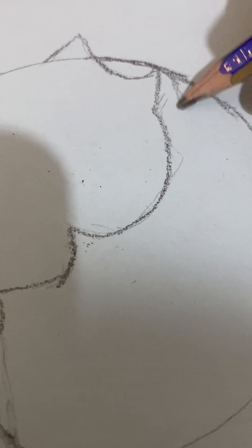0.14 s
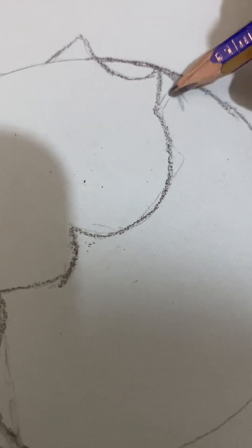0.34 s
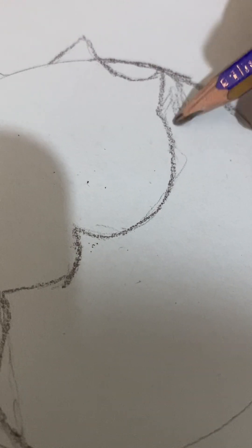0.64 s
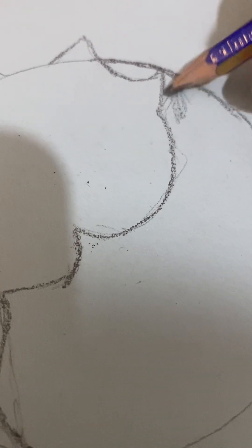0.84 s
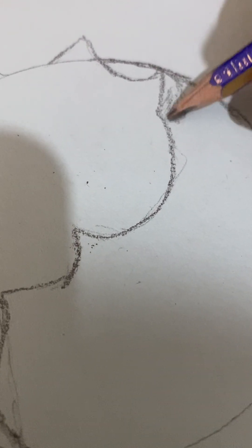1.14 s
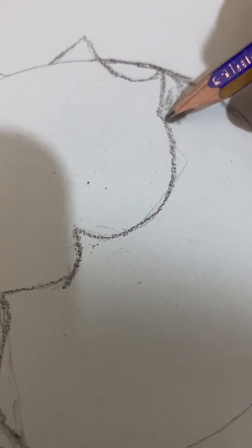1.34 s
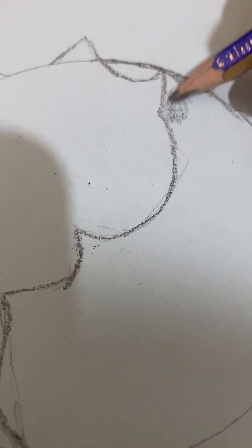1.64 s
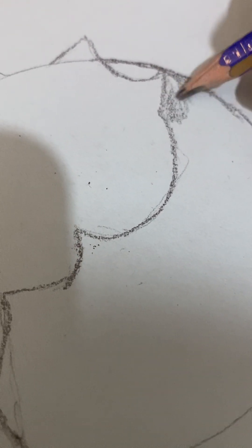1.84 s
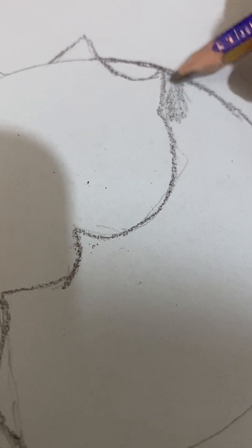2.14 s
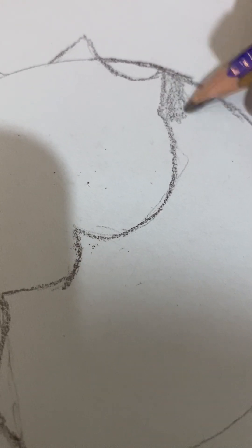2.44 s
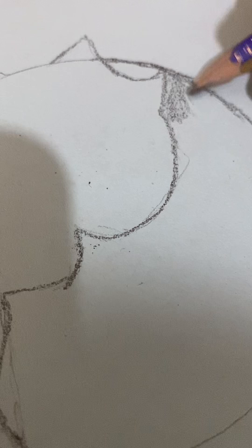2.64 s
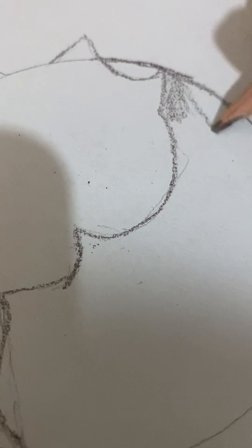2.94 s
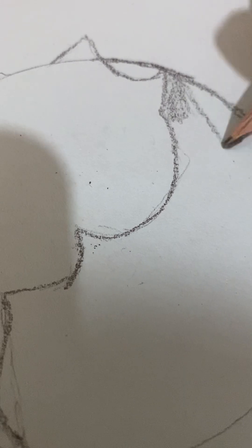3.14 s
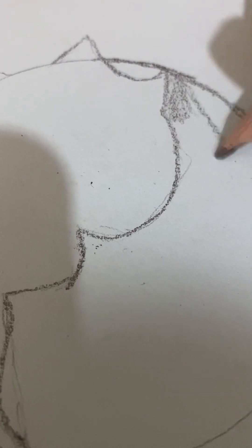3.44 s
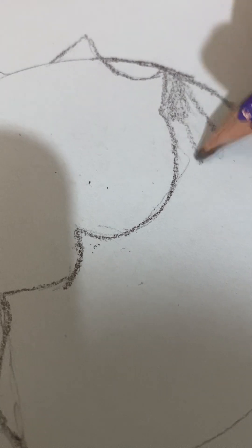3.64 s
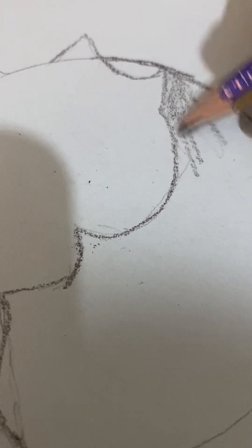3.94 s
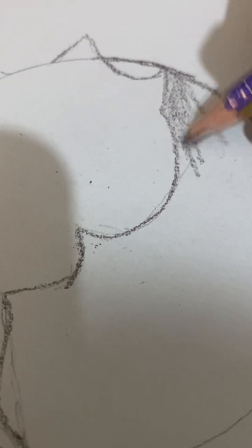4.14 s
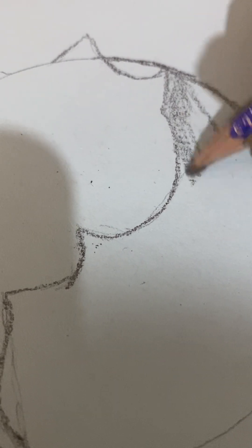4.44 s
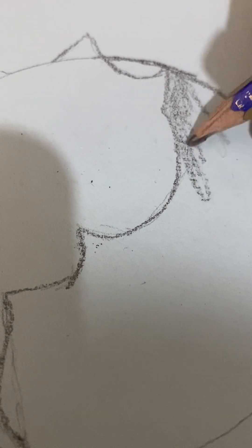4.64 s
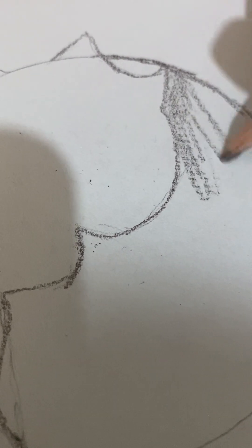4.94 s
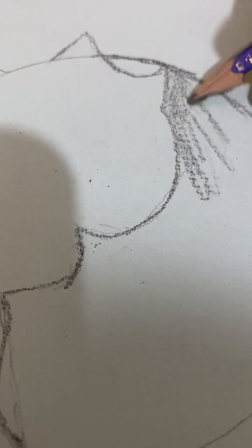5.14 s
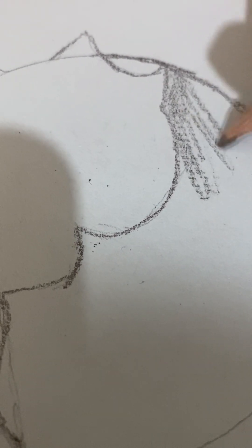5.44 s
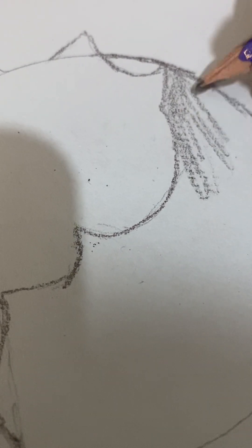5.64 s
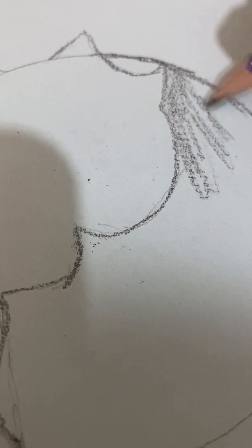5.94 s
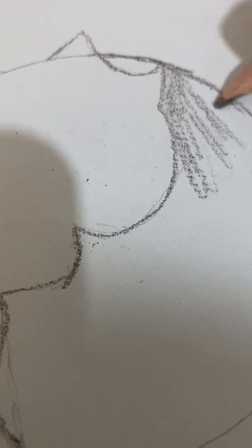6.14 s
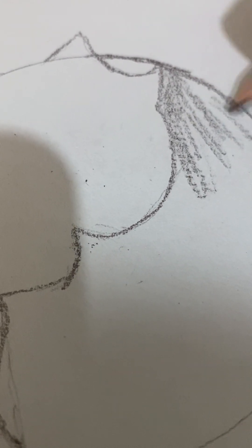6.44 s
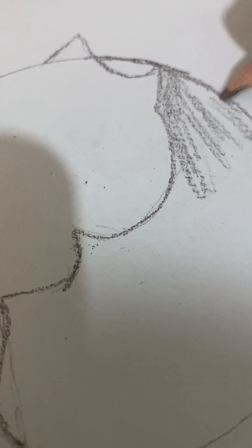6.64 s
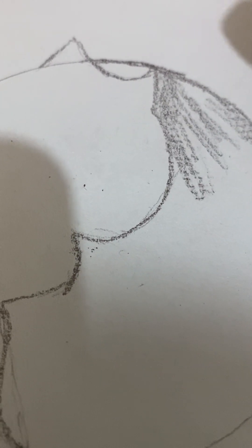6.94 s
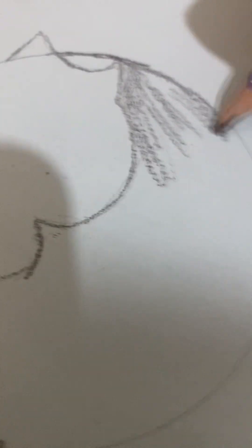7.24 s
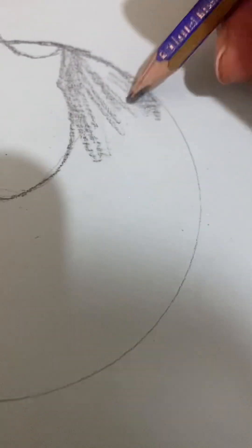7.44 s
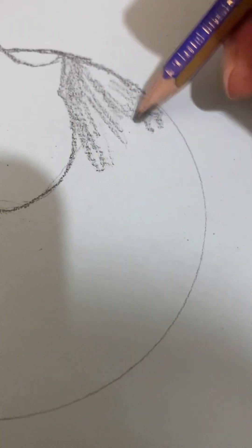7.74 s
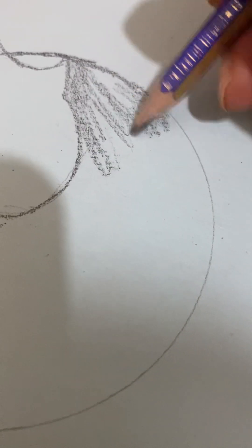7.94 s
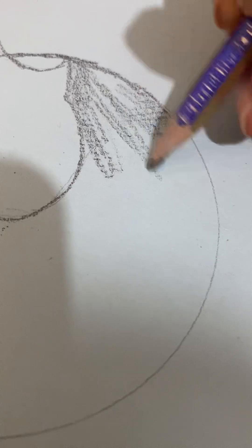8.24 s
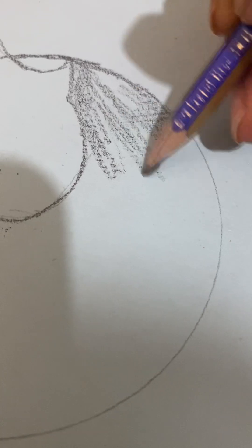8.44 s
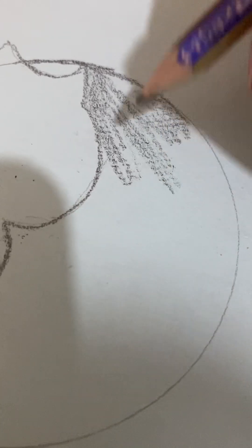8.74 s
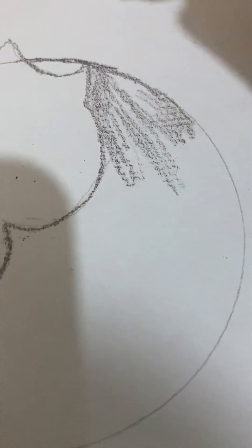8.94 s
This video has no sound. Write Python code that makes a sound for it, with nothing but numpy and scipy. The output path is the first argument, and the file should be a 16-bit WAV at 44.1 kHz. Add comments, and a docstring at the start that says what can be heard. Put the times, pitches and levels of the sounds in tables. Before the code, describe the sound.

A pencil shades on paper in quick back-and-forth strokes, the lead hissing and rasping over a hollow board. Now and then the tip ticks or knocks lightly. Near the end comes one soft low thump, the last strokes grow louder, and a hand brushes the sheet among a few final ticks. The microphone is close, in a quiet room with a low hum.

```python
"""A quiet room, a phone close above a pencil and paper on a hollow board; a low room resonance hums.
From the start the pencil shades in quick back-and-forth strokes: the lead hisses over the paper's
tooth and shakes the board. Now and then the tip ticks as it lands or lifts, knocking hardest at 5.7 s.
Just after 8 s the room booms once under a soft thump and the last strokes grow louder.
Around 9 s the hand brushes the sheet as it leaves, among a few last ticks."""
import sys
import numpy as np
from scipy import signal
from scipy.fft import rfft, irfft, next_fast_len
from scipy.io import wavfile
from scipy.ndimage import uniform_filter1d

SR = 44100
rng = np.random.default_rng(int(sys.argv[2]) if len(sys.argv) > 2 else 0)


def log_audio(samples):
    """Write samples as a 16-bit WAV file to the path given in sys.argv[1]."""
    # one column per channel
    frames = np.atleast_2d(samples).T
    # limit to full scale, then quantise
    limited = np.clip(frames, -1, 1)
    pcm = np.round(limited * 32767).astype(np.int16)
    wavfile.write(sys.argv[1], SR, pcm)


N = 400428
FFT_SIZE = next_fast_len(N)
BIN_HZ = np.arange(FFT_SIZE // 2 + 1) * SR / FFT_SIZE
DOWN, UP = "down", "up"


def strokes(release_ms=5.6, hiss_arch_db=2.5, board_arch_db=6):
    """Hiss gain, board gain, brightness in dB: the tip bites, runs fastest mid-stroke, stops to turn."""
    # the shading: (start [s], length [s], hiss level [dB], direction)
    shading = [(0.08, 0.099, -52, DOWN), (0.214, 0.073, -54, UP), (0.328, 0.079, -52, DOWN),
               (0.436, 0.051, -55, UP), (0.494, 0.041, -57.5, UP), (0.57, 0.099, -53, DOWN),
               (0.688, 0.091, -53.5, UP), (0.818, 0.087, -52, DOWN), (0.926, 0.085, -54.5, UP),
               (1.041, 0.076, -51.5, DOWN), (1.15, 0.084, -56, UP), (1.262, 0.085, -53.5, DOWN),
               (1.376, 0.086, -54, UP), (1.493, 0.075, -55, DOWN), (1.581, 0.063, -58.5, UP),
               (1.715, 0.088, -54.5, DOWN), (1.847, 0.068, -56.5, UP), (1.958, 0.067, -54.5, DOWN),
               (2.051, 0.1, -57, UP), (2.183, 0.074, -54.5, DOWN), (2.274, 0.099, -58.5, UP),
               (2.392, 0.11, -54.5, DOWN), (2.53, 0.069, -59, UP), (2.618, 0.1, -50, DOWN),
               (2.728, 0.033, -62.5, UP), (2.833, 0.082, -53, DOWN), (3.005, 0.018, -51.5, UP),
               (3.054, 0.086, -51.5, DOWN), (3.166, 0.11, -57, UP), (3.295, 0.11, -53, DOWN),
               (3.418, 0.087, -55.5, UP), (3.533, 0.092, -51.5, DOWN), (3.648, 0.092, -53.5, UP),
               (3.754, 0.098, -51, DOWN), (3.873, 0.084, -51.5, UP), (3.975, 0.091, -52.5, DOWN),
               (4.097, 0.077, -53, UP), (4.195, 0.1, -52, DOWN), (4.325, 0.069, -51.5, UP),
               (4.421, 0.11, -50.5, DOWN), (4.541, 0.059, -52, UP), (4.646, 0.1, -53, DOWN),
               (4.764, 0.064, -52.5, UP), (4.891, 0.1, -52, DOWN), (5.008, 0.049, -58, UP),
               (5.132, 0.082, -50, DOWN), (5.219, 0.057, -62.5, UP), (5.379, 0.078, -50.5, DOWN),
               (5.47, 0.053, -63.5, UP), (5.698, 0.07, -52.5, DOWN), (5.801, 0.088, -55.6, UP),
               (5.915, 0.098, -49.5, DOWN), (6.156, 0.093, -49, DOWN), (6.273, 0.047, -53, UP),
               (6.333, 0.038, -54, UP), (6.403, 0.11, -50.5, DOWN), (6.518, 0.023, -54.5, UP),
               (6.633, 0.11, -52.5, DOWN), (6.758, 0.072, -56, UP), (6.86, 0.11, -52, DOWN),
               (6.98, 0.077, -56, UP), (7.086, 0.084, -53, DOWN), (7.197, 0.054, -61, UP),
               (7.275, 0.06, -63.5, DOWN), (7.37, 0.072, -59, UP), (7.468, 0.077, -52.5, DOWN),
               (7.582, 0.079, -54, UP), (7.694, 0.088, -51, DOWN), (7.815, 0.066, -53.5, UP),
               (7.904, 0.1, -49.5, DOWN), (8.037, 0.07, -52, UP), (8.127, 0.093, -49, DOWN),
               (8.241, 0.083, -53.7, UP), (8.348, 0.1, -46, DOWN), (8.475, 0.067, -48, UP),
               (8.564, 0.083, -45.5, DOWN)]
    # downstrokes bite and fade, upstrokes are duller and swell:
    # (brightness [dB], swell from middle to end [dB], attack [ms], board level [dB])
    directions = {DOWN: (1, -2.5, 5.5, 0.5), UP: (-3.5, 2, 5.5, -0.5)}
    # the hand's travel over the sheet: (time [s], board over hiss [dB], brightness [dB])
    travel = [(0.1, -1.5, -4.5), (1.5, -1.5, -2), (1.75, -12, -1.5), (2.1, -4, -0.5), (2.3, 0.5, -1),
              (2.7, 4, -6), (3.2, 6.5, -7), (4.1, 9.5, -3.5), (4.4, 3, -1), (4.8, 9, -1.5), (5.4, 3.5, -5),
              (5.7, 6, -4.5), (6.3, 4, 0), (6.65, 7, 1.5), (7.1, 2, 5), (7.4, 0, -7.5), (7.8, -1.5, -2.5),
              (8.2, 3, -3.5), (8.6, 2, -1.5)]
    times, board_curve, bright_curve = np.transpose(travel)
    hiss, shake, brightness = np.zeros((3, N))
    for start, length, hiss_db, way in shading:
        bright_db, swell_db, attack_ms, board_db = directions[way]
        board_db = board_db + hiss_db + np.interp(start, times, board_curve)
        bright_db = bright_db + np.interp(start, times, bright_curve)
        at = np.arange(int((start - .07) * SR), int((start + length + .07) * SR))
        ms = 1000 * (at / SR - start)
        along = np.clip(ms / (500 * length) - 1, -1, 1)  # -1 at the start, 1 at the end
        attack = 1 / (1 + 4 ** (-ms / attack_ms))
        edges = attack / (1 + 4 ** ((ms - 1000 * length) / release_ms))
        gain = edges * undb(hiss_db + swell_db * along - hiss_arch_db * along ** 2)
        brightness[at] = np.where(gain > hiss[at], bright_db, brightness[at])  # the louder stroke wins
        hiss[at] += gain
        shake[at] += edges * undb(board_db + swell_db * along - board_arch_db * (along - .25) ** 2)
    return hiss, shake, uniform_filter1d(brightness, SR // 200)


def scratch(gain, bright_db, catch_db=2.2):
    """The lead hisses and catches on the paper; each band wavers a little as the tip turns."""
    # grip and worn tip colour the hiss: (time [s], rasp near 5 kHz [dB], sheen near 10 kHz [dB])
    grip = [(0, 0, -1), (2.4, -1.5, -1), (3.5, 0.5, 0.5), (5, 1, -0.5), (6, 2, -1.5), (7.1, 4.5, -4),
            (7.4, 5.5, 0), (8.6, 3.5, 1)]
    times, *columns = np.transpose(grip)
    rasp_db, sheen_db = (np.interp(np.arange(N) / SR, times, column) for column in columns)
    grit = level(shaft(tooth()), 0)
    bands = split(grit, edges_hz=(4680, 6040, 7860, 11250), soft_hz=320)
    gains_db = (-.2 * bright_db, rasp_db - .5 * bright_db, -.4 * bright_db,
                sheen_db + .16 * bright_db, .71 * bright_db)
    hiss = sum(part * undb(db + 1.2 * walk(12)) for part, db in zip(bands, gains_db))
    return hiss * gain * undb(catch_db * walk(70))


def tooth(grain_db=1.97):
    """The paper's tooth: grains of uneven size, like fibres snapping under the lead."""
    # spectrum of lead on paper: (frequency [Hz], level [dB])
    spectrum = [(450, -1), (1200, -3), (2000, -7), (2900, -3), (3900, -5), (4800, -1), (7200, -9),
                (8600, -4), (10300, 0), (11300, -1.5), (12500, 1.5), (15800, -2)]
    grains = noise() * undb(grain_db * rng.exponential(1, N))
    return colour(level(grains, 0), spectrum)


def shaft(grit):
    """The pencil's own resonances, each waxing and waning as it turns in the fingers."""
    # ring of lead and wood: (frequency [Hz], width [Hz], gain [dB])
    rings = [(4900, 190, -8.5), (5746, 500, 0.5), (6660, 170, 2.5)]
    return grit + sum(band(grit, hz, width) * undb(db + 3.5 * walk(7)) for hz, width, db in rings)


def board(push):
    """The hollow board rung by a force; neighbouring modes swing in opposite senses at the microphone."""
    # board modes: (frequency [Hz], gain [dB], time to fall 60 dB [s])
    modes = [(186, -24, .08), (305.6, 3.5, 0.074), (446, -1, 0.02), (605, -1, 0.014), (1175, -8.5, 0.0046)]
    ring = 0
    for order, (hz, db, t60) in enumerate(modes):
        pole = np.exp(2j * np.pi * hz / SR - np.log(1000) / (t60 * SR))
        ring = ring + (-1) ** order * undb(db) * signal.lfilter([1], [1, -pole], push).imag
    # the small board sends out no deep bass
    return signal.sosfilt(signal.butter(2, 170, "high", fs=SR, output="sos"), ring)


def ticks(crack_s=0.0011, tail_s=0.0072, tail_db=-22, push_s=0.00027, late_s=0.0019):
    """The tip lands or lifts: a sharp crack with a papery tail, then a push that knocks the board."""
    # touches of the tip: (time [s], crack level [dB], push on the board [dB])
    touches = [(1.679, -57, -44.5), (3.0093, -48.5, -57), (4.8645, -64, -39), (5.694, -47, -28),
               (6.038, -59, -62), (6.1284, -74, -41.5), (6.4358, -47, -34), (6.6087, -73, -43.5),
               (8.6885, -44, -45), (8.732, -52, -58), (8.7981, -50, -55), (8.9846, -34, -73),
               (9.0257, -47, -51)]
    t = np.arange(SR // 20) / SR
    crack, push = np.zeros((2, N + len(t)))
    spike = (t / crack_s * np.exp(1 - t / crack_s)) ** 2
    tail = undb(tail_db) * np.exp(-t / tail_s) * (t > crack_s)
    blow = np.hanning(int(push_s * SR))
    for start, crack_db, push_db in touches:
        at, late = int(start * SR), int((start + late_s) * SR)
        crack[at:at + len(t)] += undb(crack_db) * (spike + tail)
        push[late:late + len(blow)] += undb(push_db) * blow / blow.sum()
    snap = level(colour(noise(), [(1000, -8.0), (4000, -1.5), (8000, -2.5)]), 1.4)
    return crack[:N] * snap + board(push[:N])


def brushes():
    """Gain of the light rustle as the hand leaves the sheet: each brush swells and dies away."""
    # sweeps of the hand: (peak time [s], level [dB], rise [s], fall [s])
    sweeps = [(8.70, -55.5, .012, 0.037), (8.93, -63, 0.041, 0.079), (9.025, -65.5, 0.029, 0.0049)]
    t = np.arange(N) / SR
    return sum(undb(db) * np.exp(-np.abs(t - peak) / np.where(t < peak, rise, fall))
               for peak, db, rise, fall in sweeps)


def phone_echo(x, bright_db, lag_s=0.000833, sway=0.078, lean_per_db=.015, gain=0.15):
    """A reflection off the phone just above; its path drifts with the hand and shifts with each stroke."""
    lag = (lag_s * SR * (1 + sway * walk(2) + lean_per_db * bright_db)).astype(int)
    reflected = x[:, np.maximum(np.arange(N) - lag, 0)]
    return (x + gain * reflected) / np.sqrt(1 + gain ** 2)


def thump():
    """A soft weight lands: the room's low resonance swells and dies within a few cycles."""
    # the boom: (start [s], peak level [dB], frequency [Hz], time to peak [s], abruptness [exponent])
    boom = (8.142, -25.8, 58.3, .075, 2.2)
    start, peak_db, hz, rise_s, abruptness = boom
    t = np.maximum(np.arange(N) / SR - start, 0)
    swell = (t / rise_s * np.exp(1 - t / rise_s)) ** abruptness
    return undb(peak_db) * swell * np.sin(2 * np.pi * hz * t)


def walls(x, t60_s=0.33, tail_db=-16):
    """The walls return a decaying tail, faint this close to the pencil."""
    t = np.arange(int(.6 * SR)) / SR
    tail = rng.standard_normal(len(t)) * undb(-60 * t / t60_s) * (t > .004)
    tail *= undb(tail_db) / np.sqrt(np.sum(tail ** 2))
    return signal.fftconvolve(x, tail[None], axes=1)[:, :N]


def room_tone(air_db=-52):
    """Dull room noise with a few wavering low resonances."""
    # spectrum of the room's air: (frequency [Hz], level [dB])
    spectrum = [(25, -33), (42, -5), (70, 0.5), (100, -2.5), (146, -10.5), (195, -5.5), (300, -10),
                (470, -14.5), (920, -24), (2000, -34.5), (4000, -39), (8000, -54.5), (16000, -55)]
    # room resonances: (frequency [Hz], filter width [Hz], level [dB])
    resonances = [(55.74, 9.3, -54), (118.6, 2.2, -72), (198.6, 11.6, -64)]
    hum = sum(level(band(band(noise(), hz, width), hz, width), db) for hz, width, db in resonances)
    return level(colour(noise(), spectrum), air_db) + hum


def undb(db):
    """Gain of a level in dB."""
    return 10 ** (np.asarray(db) / 20)


def level(x, db):
    """Scale to an rms level."""
    return x * undb(db) / np.sqrt(np.mean(x ** 2))


def noise():
    """Two unrelated noises: the direct wave and what is scattered round the phone."""
    return rng.standard_normal((2, N))


def walk(rate_hz):
    """Glide between random values, rate_hz of them a second; spread near 1."""
    hold = int(SR / rate_hz)
    steps = np.repeat(rng.standard_normal(N // hold + 1), hold)
    return uniform_filter1d(steps, hold)[:N]


def colour(x, points):
    """Filter by (frequency [Hz], gain [dB]) points."""
    hz, db = np.transpose(points)
    gain = undb(np.interp(np.log(np.maximum(BIN_HZ, 1)), np.log(hz), db))
    return irfft(rfft(x, FFT_SIZE) * gain, FFT_SIZE)[..., :N]


def band(x, hz, width_hz):
    """Two-pole resonance, gain 1 at the centre."""
    return signal.lfilter(*signal.iirpeak(hz, hz / width_hz, fs=SR), x)


def split(x, edges_hz, soft_hz):
    """Neighbouring bands that add up to the whole."""
    whole = rfft(x, FFT_SIZE)
    above = [1] + [.5 + .5 * np.tanh((BIN_HZ - edge) / soft_hz) for edge in edges_hz] + [0]
    return [irfft(whole * (a - b), FFT_SIZE)[..., :N] for a, b in zip(above, above[1:])]


def scene():
    """Pencil up close, room behind it; row 0 is the direct wave, row 1 its scattered twin."""
    hiss_gain, board_gain, bright_db = strokes()
    friction = noise() * undb(2.96 * walk(45))
    shaken = level(board(friction), 2.02) * board_gain
    hiss = scratch(hiss_gain + brushes(), bright_db)
    pencil = phone_echo(hiss, bright_db) + shaken + ticks()
    return pencil + walls(pencil) + room_tone() + thump()


def record(dry, dwell=0.23, top_hz=15720):
    """The phone's two spaced microphones: lag turns the treble between mid and side; scatter widens it."""
    # the pair: (frequency [Hz], left phase lead [rad], left minus right [dB], likeness [0-1])
    ports = [(60, 0, 0, .9995), (300, 0, -2.6, .99), (800, -.1, -1.5, .87), (1500, -.3, 2, .85),
             (2000, -.3, -2, .6), (2500, -2.0, 0, .3), (3600, -1.6, -2.5, .3), (4900, 0, 0, .7),
             (7450, 3.14, 0, .7), (10400, 6.28, 0, .7), (13350, 9.42, 0, .7), (15900, 12.4, 0, .7)]
    hz, *columns = np.transpose(ports)
    phase, pan_db, alike = (np.interp(BIN_HZ, hz, column) for column in columns)
    phase = phase - dwell * np.sin(2 * phase) / 2  # lingers near whole and half turns
    direct, scattered = rfft(dry, FFT_SIZE)
    diffuse = np.sqrt(1 - alike ** 2) * scattered
    below_treble = np.exp(-(BIN_HZ / 3500) ** 4)
    mid = np.cos(phase / 2) * direct
    side = 1j * np.sin(phase / 2) * (alike * direct + diffuse) + .72 * below_treble * diffuse
    left, right = (mid + side) * undb(pan_db / 2), (mid - side) * undb(-pan_db / 2)
    pair = irfft(np.array([left, right]), FFT_SIZE)[:, :N]
    return signal.sosfilt(signal.ellip(10, .2, 70, top_hz, fs=SR, output="sos"), pair)


dry = scene()
out = record(dry)
log_audio(out)
```